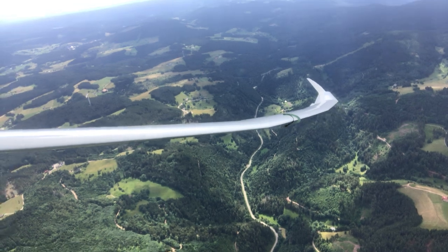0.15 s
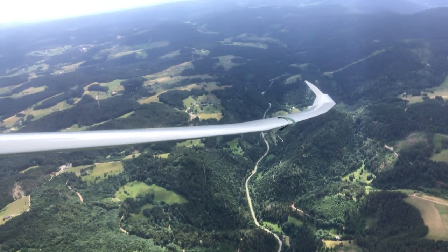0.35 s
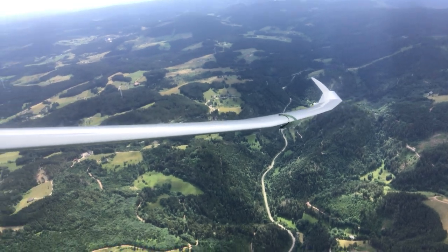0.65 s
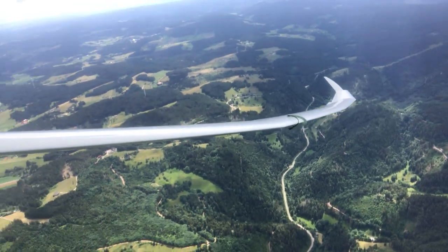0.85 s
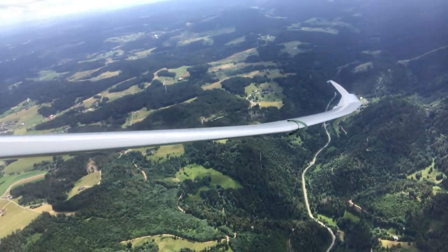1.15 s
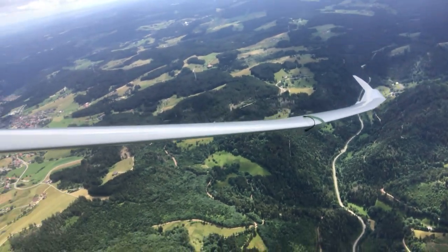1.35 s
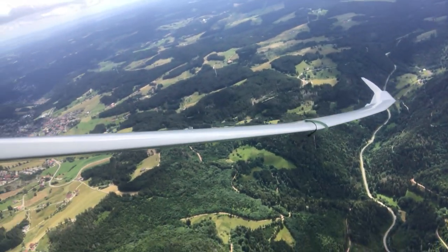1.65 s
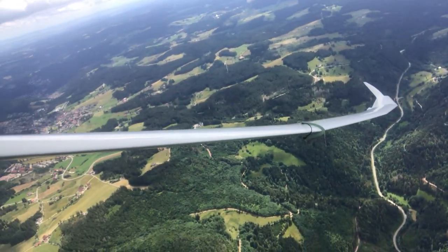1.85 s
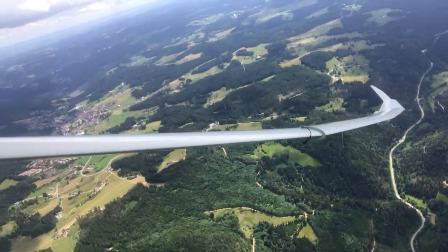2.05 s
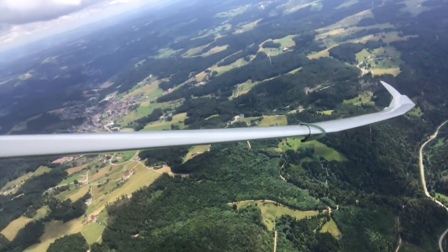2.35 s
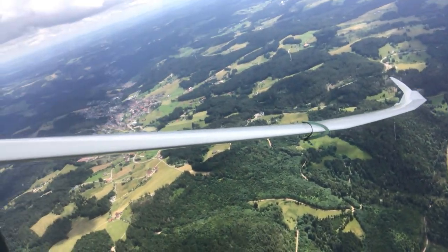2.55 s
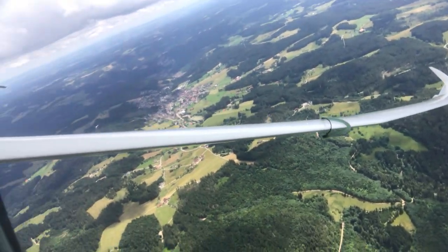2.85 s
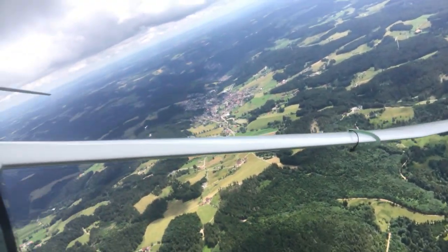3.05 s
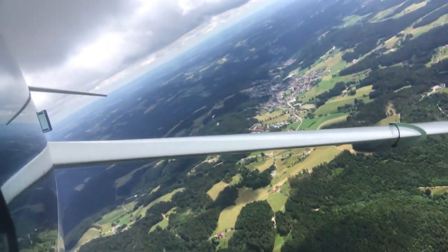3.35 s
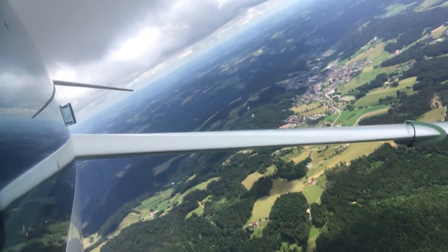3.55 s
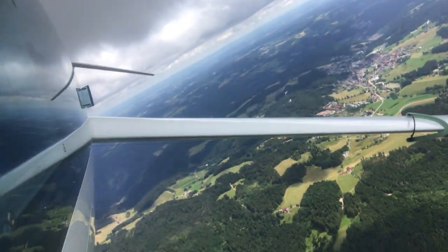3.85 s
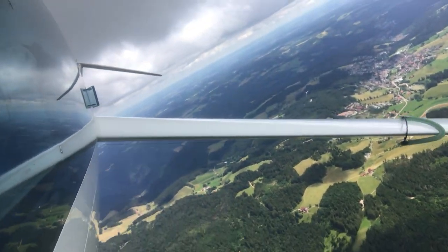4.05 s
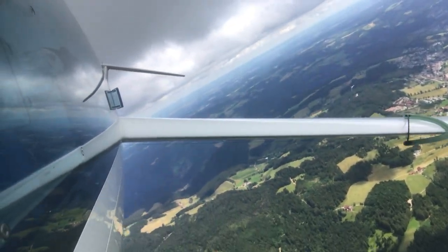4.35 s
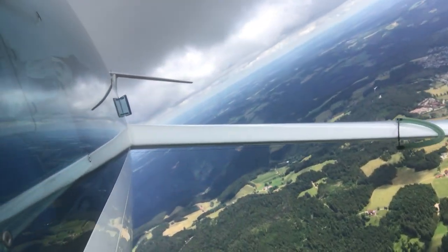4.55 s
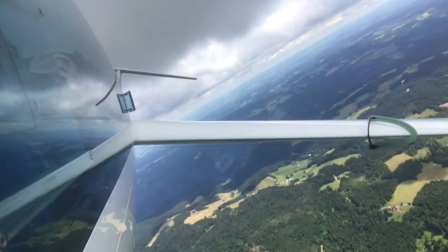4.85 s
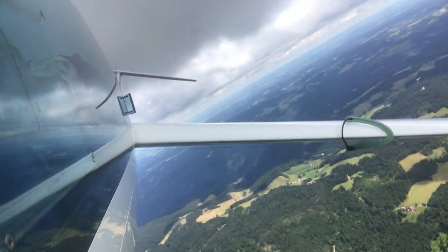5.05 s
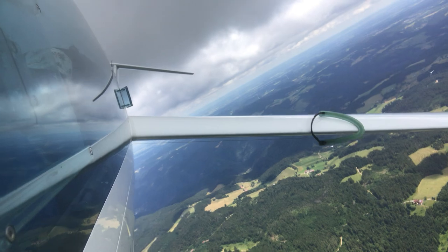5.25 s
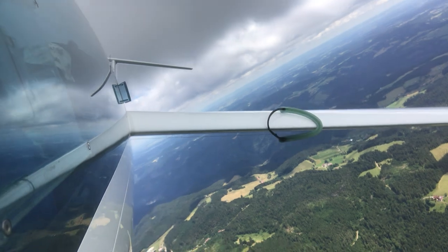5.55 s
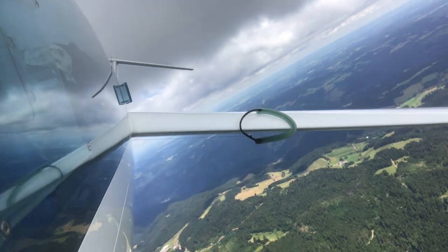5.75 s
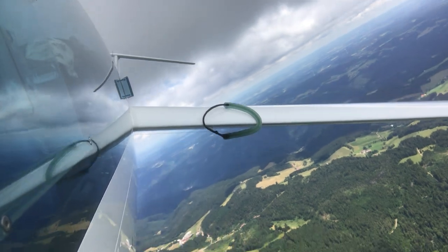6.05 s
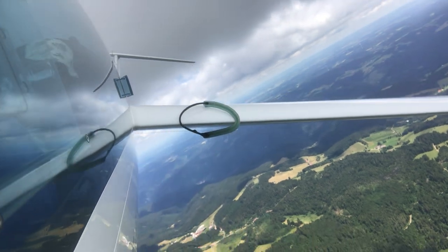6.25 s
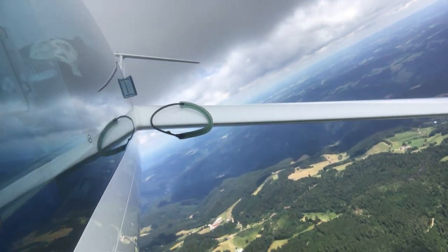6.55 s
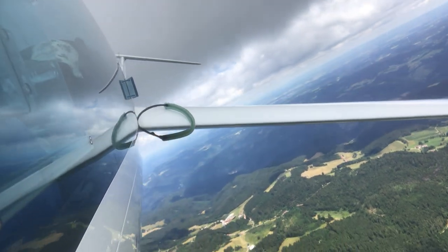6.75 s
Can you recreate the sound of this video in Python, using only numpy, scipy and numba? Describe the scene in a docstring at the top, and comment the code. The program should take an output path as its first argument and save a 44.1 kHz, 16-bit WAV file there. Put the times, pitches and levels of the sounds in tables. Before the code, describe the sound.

Blustery air gurgles at a microphone, a harsh roaring blast overloads it, then steady hiss remains with soft wind thumps and tiny dry pops.

```python
"""Cockpit of a glider in flight: slipstream on a small microphone.
Eddies and single vortices, as filtered noise and chirped sines, first burble over the microphone port.
A fast jet, sputtering broadband noise with narrow-band howls, then hits the port and overloads the input.
It drops away and leaves low noise thumps and churning under a steady hiss, with small dry pops."""
import sys
import numpy as np
from scipy import signal
from scipy.fft import rfft, irfft
from scipy.io import wavfile
from scipy.ndimage import uniform_filter1d
from numba import njit

SR = 44100
rng = np.random.default_rng(int(sys.argv[2]) if len(sys.argv) > 2 else 0)


def dump_mix(stems):
    """Bounce the given channels to the path in sys.argv[1] as a 16-bit WAV at rate SR."""
    frames = np.atleast_2d(stems).T  # one column per channel
    limited = np.clip(frames, -1, 1)  # hard clip at full scale
    pcm = np.round(limited * 32767).astype(np.int16)
    wavfile.write(sys.argv[1], SR, pcm)


N = 303849


def undb(db):
    """Logarithmic level: decibels become an amplitude gain."""
    return 10 ** (np.asarray(db) / 20)


def unit(x):
    """Normalization: scale a signal to rms 1."""
    return x / np.sqrt(np.mean(x ** 2))


def curves(rows):
    """Linear interpolation: one value per sample for each column after the time."""
    s, *columns = np.transpose(rows)
    return [np.interp(np.arange(N) / SR, s, c) for c in columns]


def gate(start, end, fade):
    """Linear gating: 1 between two times, fading to 0 outside them."""
    t = np.arange(N) / SR
    return np.clip(1 + np.minimum(t - start, end - t) / fade, 0, 1)


def swell(start, end, attack, release):
    """Gaussian envelope: bell-shaped rise to 1 at the start, a hold, a bell-shaped fall from the end."""
    t = np.arange(N) / SR
    rise = np.exp(-(np.minimum(t - start, 0) / attack) ** 2 / 2)
    fall = np.exp(-(np.maximum(t - end, 0) / release) ** 2 / 2)
    return rise * fall


def flutter(rate, depth_db):
    """Random modulation: low-passed noise makes a gain of rms 1 that changes about `rate` times a second."""
    f = np.fft.rfftfreq(N, 1 / SR)
    spectrum = rfft(rng.standard_normal(N)) / (1 + (f / rate) ** 4)
    walk = unit(irfft(spectrum, N))
    return unit(undb(depth_db * np.clip(walk, -2, 2)))


def noise(colour, band):
    """Spectral shaping: white noise takes on a colour, with rms 1 inside a band."""
    f = np.fft.rfftfreq(N, 1 / SR)
    hz, db = np.transpose(colour)
    spectrum = rfft(rng.standard_normal(N)) * undb(np.interp(np.log(f + 1), np.log(hz), db))
    # roll off beyond both ends of the table
    spectrum *= 1 / (1 + (f / hz[-1] / 2) ** 4) * f / (f + hz[0] / 2)
    inside = spectrum[(f > band[0]) & (f < band[1])]
    return irfft(spectrum, N) * N / np.sqrt(2 * np.sum(np.abs(inside) ** 2))


@njit
def svf(x, hz, damping):
    """State-variable filtering: two integrators in a loop give low-pass and band-pass at a moving centre."""
    out, band, low = np.empty((2, len(x))), 0., 0.
    for i in range(len(x)):
        g = np.tan(np.pi * hz[i] / SR)
        v = (band + g * (x[i] - low)) / (1 + g * (g + damping))
        out[0, i], out[1, i] = low + g * v, damping * v
        band, low = 2 * v - band, low + 2 * g * v
    return out


def resonate(x, hz, damping):
    """Damped resonance: low-pass and band-pass outputs at a fixed or moving frequency."""
    return svf(x, np.clip(hz * np.ones(N), 10, SR / 2.3), float(damping))


# rush along the canopy in the free stream: (time [s], nominal hiss level [dB])
CANOPY_RUSH = [(3.28, -60.5), (4.17, -45), (5.13, -44.5), (5.56, -41), (5.96, -42.5), (6.15, -41),
               (6.77, -41), (6.85, -43)]
# gusts in the free stream:
# (time [s], Gaussian half length [s], rise of the buffeting [dB], rise of the churning [dB])
STREAM_GUSTS = [(3.42, 0.092, 5, 1.5), (3.816, 0.028, 8, 4.5), (4.346, 0.14, 3, 1.5), (4.766, .08, 6, 9),
                (4.992, 0.049, 5, 7.5), (5.66, 0.051, 4.5, 9.5), (6.68, .07, 4.5, 7)]
LEE_HISS_DB, CRUISE_HISS_DB = -64, -43  # nominal hiss in the lee; reference hiss in the full stream
# buffeting and churning at the reference hiss [dB], and the dB they gain per dB of rush
STREAM_THUMP_DB, THUMP_FOLLOW = -18.5, 0.75
STREAM_CHURN_DB, CHURN_FOLLOW = -31, 0.43


def stream():
    """Flow-speed scaling: buffeting and churning grow with the rush and swell in gusts.

    Returns the hiss level, the churn level and the power of the thumps."""
    hiss_db, = curves(CANOPY_RUSH)
    thump_db = STREAM_THUMP_DB + THUMP_FOLLOW * (hiss_db - CRUISE_HISS_DB)
    churn_db = STREAM_CHURN_DB + CHURN_FOLLOW * (hiss_db - CRUISE_HISS_DB)
    for s, length, thump_rise_db, churn_rise_db in STREAM_GUSTS:
        gust = swell(s, s, length, length)
        thump_db = thump_db + thump_rise_db * gust
        churn_db = churn_db + churn_rise_db * gust
    arrived = gate(3.12, 7, fade=.1)
    hiss_db = LEE_HISS_DB + arrived * (hiss_db - LEE_HISS_DB)
    return hiss_db, churn_db, (arrived * undb(thump_db)) ** 2


# colour of the churning: (frequency [Hz], relative spectral level [dB])
CHURN_SPECTRUM = [(120, -18), (260, 2), (360, 0), (500, -5.5), (750, -12), (1200, -22.5), (3000, -40)]
# colour of the rush: (frequency [Hz], relative spectral level [dB])
RUSH_SPECTRUM = [(300, 16.5), (800, 6), (1200, 3), (2000, -4), (3500, -11.5), (6300, -16.5), (9000, -20),
                 (14000, -26), (16000, -28.5)]


def rush(hiss_db, churn_db, lumps, follow=0.65, lee_db=-4, fine_db=1, fine_limit_db=-43.0):
    """Turbulent shear: air hisses along the canopy and churns behind its edge, harder with each buffet."""
    swirl = flutter(rate=52, depth_db=3.5) * lumps ** follow
    churn = noise(CHURN_SPECTRUM, band=(250, 700)) * swirl * undb(churn_db)
    hiss = noise(RUSH_SPECTRUM, band=(3000, 9000)) * undb(hiss_db)
    # the coarse part of the hiss flickers with the churn; the fine part stays smooth
    coarse = signal.sosfiltfilt(signal.butter(1, 3000, fs=SR, output="sos"), hiss)
    # above the limit the fine part grows no further
    fine = (hiss - coarse) * undb(fine_db + np.minimum(fine_limit_db - hiss_db, 0))
    # in the lee the hiss is duller; it opens up when the free stream reaches the port
    exposed = gate(2.4, 7, fade=.11)
    fine = fine * undb(lee_db * (0.5 - exposed))
    return exposed * churn + coarse * swirl ** 0.22 + fine


# small dry pops: (time [s], rms level over 3 ms [dB])
DRY_POPS = [(4.385, -25), (4.509, -25.5), (4.561, -29), (4.933, -22.5), (5.742, -23.5), (6.255, -22),
            (6.362, -22), (6.811, -19)]


def pops(low_hz=750, high_hz=3600, decay_s=0.00079):
    """Impulsive excitation: band-limited noise bursts of a few milliseconds poke through the wind."""
    t, out = np.arange(N) / SR, 0
    for s, db in DRY_POPS:
        burst = rng.standard_normal(N) * np.exp(-np.abs(t - s) / decay_s)
        burst = resonate(burst, low_hz, damping=1)[1]
        burst = resonate(burst, high_hz, damping=1.07)[0]
        out = out + burst * undb(db) * np.sqrt(.003 * SR / np.sum(burst ** 2))
    return out


# colour of the buffeting: (frequency [Hz], relative spectral level [dB])
BUFFET_SPECTRUM = [(15, -43), (28, -20.5), (42, -5.5), (65, 2), (120, -2.5), (200, -6.5), (320, -14.5),
                   (600, -41.5), (1500, -68)]


def buffet(power, depth_slope=0.37, full_db=-21):
    """Pressure fluctuation: large eddies thump the diaphragm; the stronger they blow, the deeper they reach."""
    strength = np.sqrt(power)
    thumps = noise(BUFFET_SPECTRUM, band=(30, 220))
    # the eddies of one gust are about equally strong
    thumps = thumps / np.sqrt(uniform_filter1d(thumps ** 2, size=3000))
    thumps = thumps * flutter(rate=20, depth_db=1.4)
    deep = signal.sosfiltfilt(signal.butter(2, 65, fs=SR, output="sos"), thumps)
    # the deep part keeps its share when the strength is full_db
    deep_gain = (strength / undb(full_db)) ** depth_slope
    return (thumps - deep + deep * deep_gain) * strength


# breeze over the port before the jet arrives: (time [s], mean shedding pitch [Hz], eddy level [dB])
LIGHT_BREEZE = [(0, 840, -19), (.17, 1075, -17.5), (.3, 484, -23.5), (.45, 437, -25.5), (.68, 503, -18.5),
                (1.08, 600, -21.5), (1.27, 505, -22.5), (1.47, 804, -30.5), (1.62, 880, -23)]
# puffs that brush the port: (time [s], Gaussian half length [s], shedding pitch [Hz],
# eddy level [dB], nominal hiss level [dB], nominal thump level [dB])
BREEZE_PUFFS = [(0.013, 0.022, 710, -9.5, -37, -16), (0.223, 0.014, 600, -11, -54, -25),
                (0.557, 0.1, 512, -33.5, -62.5, -33), (1.002, 0.052, 612, -15, -63, -22),
                (1.348, 0.017, 900, -12.5, -45.5, -26), (1.387, 0.016, 1080, -11.5, -36.5, -16.5),
                (1.504, 0.0055, 964, -21.5, -53, -22), (1.567, 0.0082, 1000, -17.5, -48, -14.5),
                (1.64, 0.011, 960, -20.5, -46, -20.5)]
# the breeze's nominal hiss and thumps, relative to its eddies; faster air hisses more
BREEZE_HISS_DB, HISS_DB_PER_OCTAVE, BREEZE_HZ, BREEZE_THUMP_DB = -50, 15, 517, -9
THUMP_LAG_S, THUMP_RELEASE_S = .012, 0.025  # the big eddies arrive late and linger


def breeze():
    """Vortex shedding: light air and its puffs set a pitch, and the powers of eddies, hiss and thumps."""
    hz, db = curves(LIGHT_BREEZE)
    eddy = undb(db) ** 2
    hiss = eddy * undb(BREEZE_HISS_DB + HISS_DB_PER_OCTAVE * np.log2(hz / BREEZE_HZ)) ** 2
    thump = eddy * undb(BREEZE_THUMP_DB) ** 2
    # where airs overlap, the pitch is their power-weighted mean
    weighted_hz = hz * eddy
    for s, length, puff_hz, eddy_db, hiss_db, thump_db in BREEZE_PUFFS:
        puff = swell(s, s, length, length)
        power = (puff * undb(eddy_db)) ** 2
        eddy, weighted_hz = eddy + power, weighted_hz + puff_hz * power
        hiss = hiss + (puff * undb(hiss_db)) ** 2
        push = swell(s + THUMP_LAG_S, s + THUMP_LAG_S, length, THUMP_RELEASE_S)
        thump = thump + (push * undb(thump_db)) ** 2
    blowing = gate(0, 1.69, fade=0.069) ** 2
    return weighted_hz / eddy, eddy * blowing, hiss * blowing, thump * blowing


def eddies(hz, power):
    """Vortex shedding: uneven eddies strike the port; faster air sheds smaller ones, so the pitch rises."""
    hz = hz * flutter(rate=54, depth_db=0.27)
    kicks = rng.standard_normal(N) * flutter(rate=67, depth_db=1.0)
    burble = resonate(kicks, 0.67 * hz, damping=2.2)[1]
    # eddies much smaller than the port cancel across it
    burble = resonate(burble, 1.087 * hz, damping=1.8)[0]
    burble = resonate(burble, 1.85 * hz, damping=1.17)[0]
    return unit(burble / np.sqrt(hz)) * np.sqrt(power)


# lesser vortices: mean level over the breeze, half range of level, middle pitch, Gaussian half length
STRAY_DB, STRAY_SCATTER_DB, STRAY_HZ, STRAY_S = 2, 6, 479, .003


def strays(count=16):
    """Random scattering: lesser vortices through the breeze, as rows like those of the strong ones."""
    times, _, breeze_db = np.transpose(LIGHT_BREEZE)
    when, size, pitch = rng.random((count, 3)).T
    # one at a random moment in each equal slot of a second
    s = .3 + (np.arange(count) + when) / count
    db = np.interp(s, times, breeze_db) + STRAY_DB + STRAY_SCATTER_DB * (2 * size - 1)
    hz = STRAY_HZ * 2 ** ((pitch - .5) / 2)
    return list(zip(s, db, hz, np.full(count, STRAY_S)))


# strong single vortices; the big slow ones thump:
# (time [s], rms level at the middle [dB], mean pitch at the middle [Hz], Gaussian half length [s])
STRONG_VORTICES = [(.048, -6, 529, 0.0044), (.099, -9.5, 490, .003), (.134, -11, 516, 0.0047),
                   (.194, -7.5, 486, 0.0053), (.235, -9.5, 510, 0.00309), (.302, -12, 530, 0.0027),
                   (.357, -16, 382, .003), (.476, -21, 336, .003), (.586, -15.5, 545, 0.0029),
                   (.612, -16, 506, 0.0025), (.708, -17.5, 560, .004), (.833, -10.5, 507, .003),
                   (.993, -7.5, 487, 0.0028), (1.14, -8.5, 500, 0.0039), (1.81, -10.5, 1902, .006),
                   (1.901, -13, 1747, .008), (4.865, -7, 111, 0.0027), (6.256, -15, 142, 0.0039),
                   (6.751, -7, 110, .006)]
# a fast vortex falls in pitch as it passes; slow ones hardly do
FALL_OCTAVES_PER_S, FAST_VORTEX_HZ = 110, 1800  # the fall at this pitch


def vortices():
    """Vortex convection: each passing vortex leaves a few uneven pressure cycles, slower as it moves on."""
    t, out = np.arange(N) / SR, np.zeros(N)
    waver = flutter(rate=290, depth_db=2.0)
    rows = list(STRONG_VORTICES) + strays()
    for (s, db, hz, length), start in zip(rows, rng.random(len(rows))):
        near = np.abs(t - s) < 4 * length
        age = t[near] - s
        fall = FALL_OCTAVES_PER_S * (hz / FAST_VORTEX_HZ) ** 2
        pitch = hz * waver[near] * 2 ** np.minimum(-fall * age, 1)
        cycles = start + np.cumsum(pitch) / SR
        envelope = np.exp(-(age / length) ** 2 / 2)
        out[near] += np.sqrt(2) * undb(db) * np.sin(2 * np.pi * cycles) * envelope
    return out


# the port howls when the jet meets its edge: (time [s], Gaussian half length [s], mean pitch [Hz],
# nominal width of each of two filter passes, before a factor of 1.36 [Hz], level at the middle [dB])
EDGE_HOWLS = [(1.732, 0.018, 1420, 1100, -10.5), (1.814, 0.095, 1280, 1000, -18),
              (2.126, 0.069, 1080, 676, -13.5), (2.663, 0.028, 720, 350, -15.5),
              (2.726, 0.036, 954, 260, -11), (2.743, 0.041, 1340, 300, -17)]


def howls():
    """Edge tone: short, rough tones of narrow-band noise swell out of the jet."""
    t, out = np.arange(N) / SR, 0
    waver = flutter(rate=14, depth_db=0.9)
    for s, length, hz, width, db in EDGE_HOWLS:
        tone = rng.standard_normal(N)
        for _ in range(2):
            tone = resonate(tone, hz * waver, width / hz * 1.36)[1]
        out = out + unit(tone) * undb(db) * np.exp(-((t - s) / length) ** 2 / 2)
    return out * gate(1.712, 3.1, fade=0.013)


# blasts of the jet: (start [s], end [s], Gaussian attack [s], Gaussian release [s],
# nominal hiss level [dB], nominal top relative to the hiss [dB], nominal thump level [dB])
JET_BLASTS = [(1.713, 1.89, 0.0055, 0.027, -20.5, -1, -14.5), (1.964, 2.005, 0.014, 0.017, -29, -11, -27),
              (1.974, 1.976, 0.0018, 0.0017, -21, 2, -30), (2.058, 2.847, 0.026, 0.063, -20, -2, -15.5),
              (2.946, 3.058, 0.043, 0.059, -23.5, -6, -21), (3.21, 3.25, .004, .004, -49.5, -24, -33)]
# a blast weakens while it lasts, and a howl robs it of its top
HISS_SAG_DB_PER_S, THUMP_SAG_DB_PER_S, HOWL_DULL_DB, DULL_LEAD_S = 0.5, 9, -7.5, 0.0085


def blasts():
    """Jet impingement: each blast strikes, sags and lets go; the powers of its hiss, top and thumps."""
    t, hiss, top, thump = np.arange(N) / SR, 0, 0, 0
    for start, end, attack, release, hiss_db, top_db, thump_db in JET_BLASTS:
        blast = swell(start, end, attack, release)
        age = np.maximum(t - start, 0)
        power = (blast * undb(hiss_db - HISS_SAG_DB_PER_S * age)) ** 2
        hiss = hiss + power
        # the top dies first, the thumps last
        top = top + power * (swell(0, end, attack, release) * undb(top_db)) ** 2
        push = swell(start + THUMP_LAG_S, end + THUMP_LAG_S, attack, release + THUMP_RELEASE_S)
        thump = thump + (push * undb(thump_db - THUMP_SAG_DB_PER_S * age)) ** 2
    howling = sum(swell(s - DULL_LEAD_S, s - DULL_LEAD_S, length, length) for s, length, *_ in EDGE_HOWLS)
    dulling = undb(HOWL_DULL_DB * np.minimum(howling, 1.2)) ** 2
    return hiss, top * dulling, thump


# colour of the jet: (frequency [Hz], relative spectral level [dB])
JET_SPECTRUM = [(90, -2), (220, 3.5), (500, 3.5), (1000, 0), (2000, -3.5), (3900, -6.5), (6000, -13),
                (9000, -21), (13500, -30), (16000, -35.5)]


def jet(power, top_power, body_db=1.5, top_db=13.5):
    """Jet noise: the hiss sputters while the jet grazes the port and runs smoother once it blows squarely."""
    hiss = noise(JET_SPECTRUM, band=(2500, 6000))
    body = signal.sosfiltfilt(signal.butter(2, 6000, fs=SR, output="sos"), hiss)
    top = (hiss - body) * np.sqrt(top_power) * undb(top_db)
    body = body * np.sqrt(power) * undb(body_db)
    square = gate(2.21, 3.09, fade=0.16)
    smooth = square * flutter(rate=210, depth_db=1.6)
    grazing = (1 - square) * flutter(rate=180, depth_db=4.5)
    return (body + top) * (smooth + grazing)


BREEZE_TOP_DB = -13.5  # nominal top of the breeze's hiss, relative to that hiss


def scene():
    """Superposition: breeze, jet and free stream in turn at one microphone, all buffeting it in uneven lumps."""
    eddy_hz, eddy_power, breeze_hiss, breeze_thump = breeze()
    blast_hiss, blast_top, blast_thump = blasts()
    rush_db, churn_db, stream_thump = stream()
    lumps = flutter(rate=14.6, depth_db=1.65)
    burble = eddies(eddy_hz, eddy_power) + vortices()
    top_power = breeze_hiss * undb(BREEZE_TOP_DB) ** 2 + blast_top
    hiss = jet(breeze_hiss + blast_hiss, top_power) + howls()
    thumps = buffet((breeze_thump + blast_thump + stream_thump) * lumps ** 2)
    return (burble + hiss + thumps + rush(rush_db, churn_db, lumps) + pops())[None]


# dips of the microphone's housing: (frequency [Hz], width at half the dB depth [Hz], gain at the centre [dB])
HOUSING_DIPS = [(4970, 530, -3.5), (7720, 590, -3.5), (10440, 980, -5)]
TOP_HZ = 15500


def record(dry, ceiling=0.62, knee=4.5):
    """Filtering and saturation: the housing cuts dips, the input rounds off loud peaks, the top is cut."""
    f = np.fft.rfftfreq(N, 1 / SR)
    dips_db = sum(db / (1 + (2 * (f - hz) / width) ** 2) for hz, width, db in HOUSING_DIPS)
    x = irfft(rfft(dry) * undb(dips_db), N)
    x = x / (1 + np.abs(x / ceiling) ** knee) ** (1 / knee)
    return signal.sosfilt(signal.ellip(10, .1, 80, TOP_HZ, fs=SR, output="sos"), x)


dry = scene()
out = record(dry)
dump_mix(out)
```